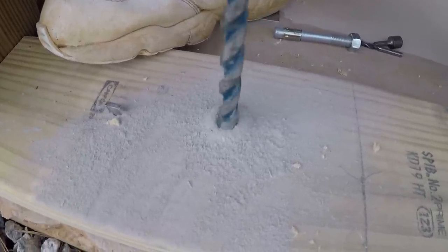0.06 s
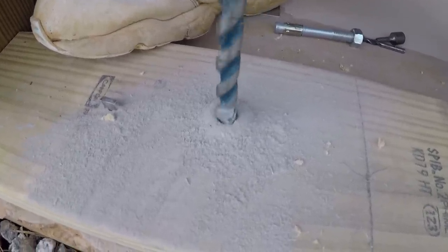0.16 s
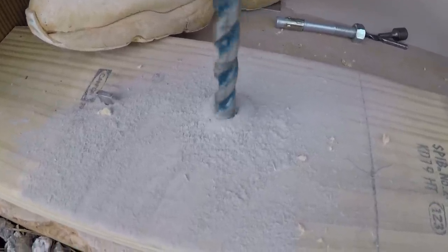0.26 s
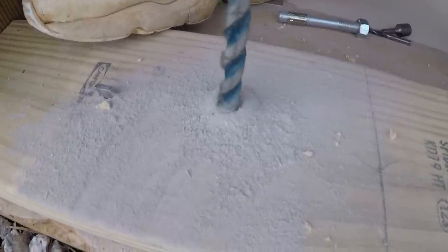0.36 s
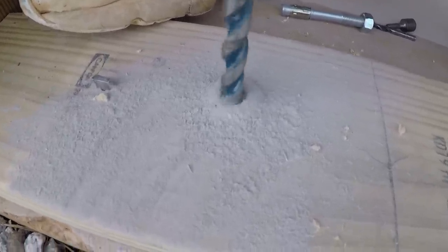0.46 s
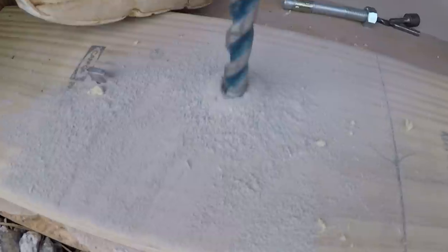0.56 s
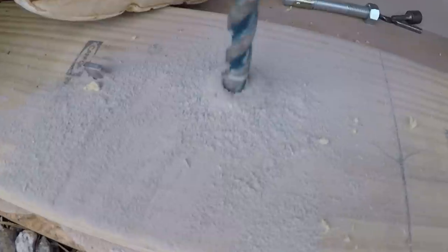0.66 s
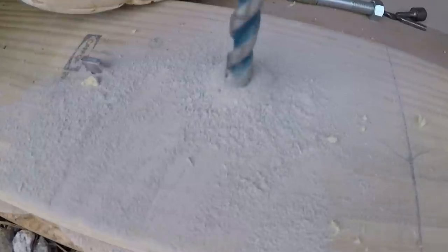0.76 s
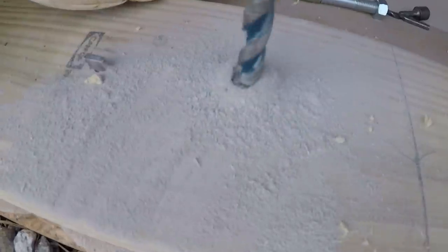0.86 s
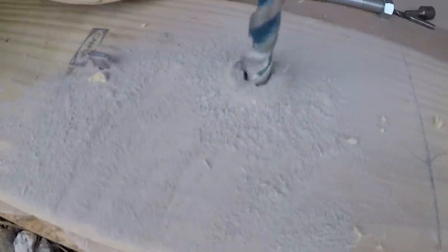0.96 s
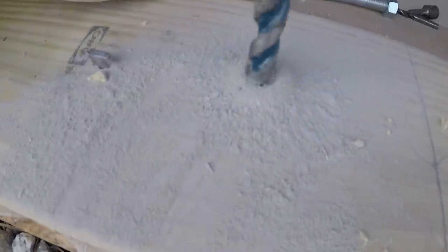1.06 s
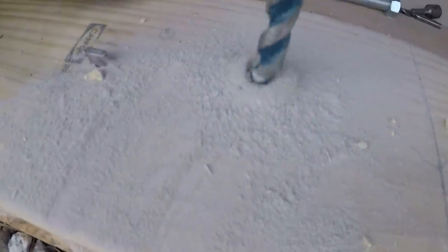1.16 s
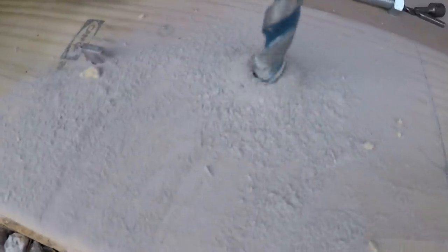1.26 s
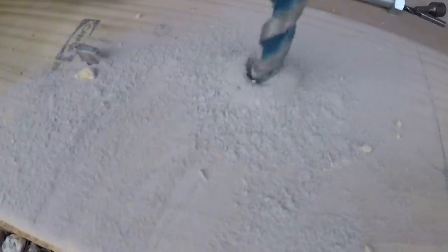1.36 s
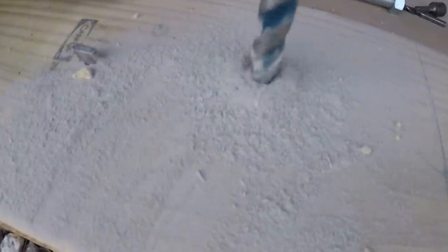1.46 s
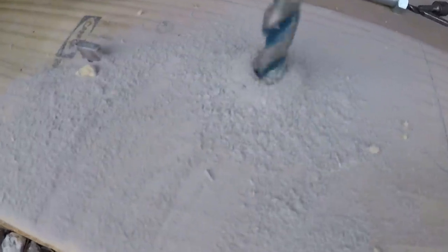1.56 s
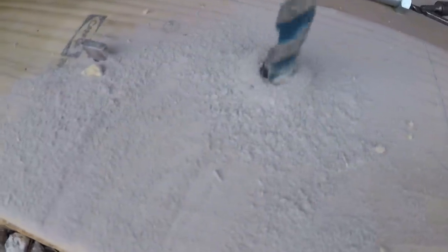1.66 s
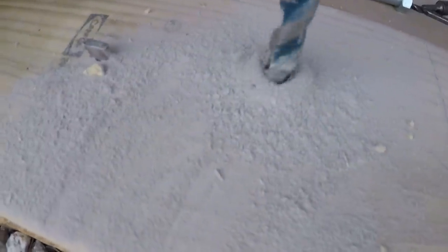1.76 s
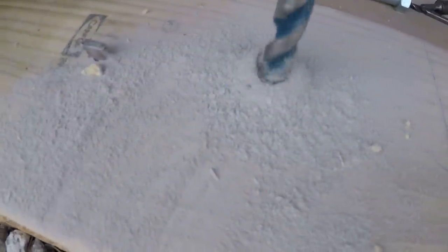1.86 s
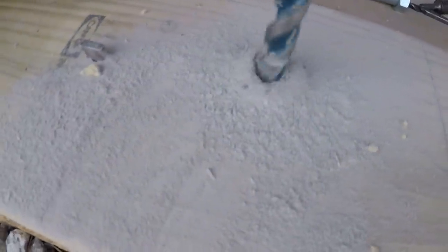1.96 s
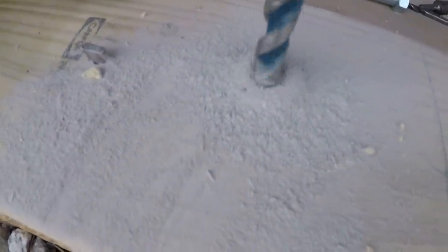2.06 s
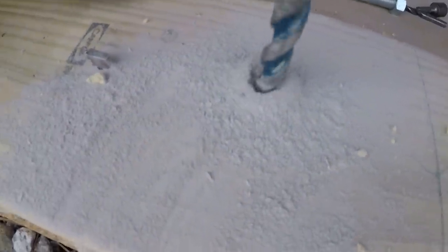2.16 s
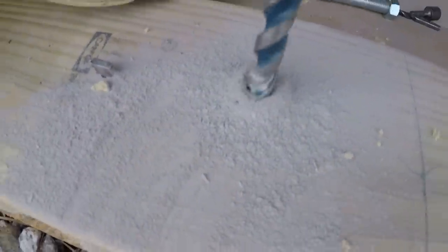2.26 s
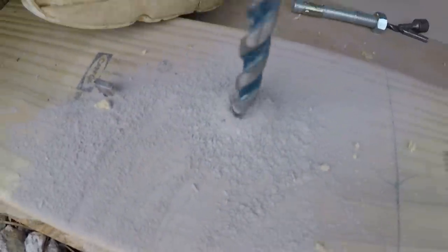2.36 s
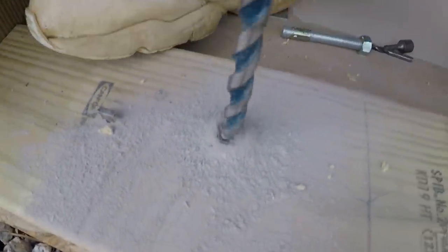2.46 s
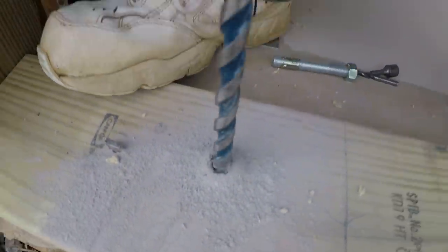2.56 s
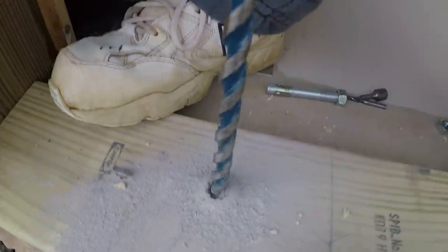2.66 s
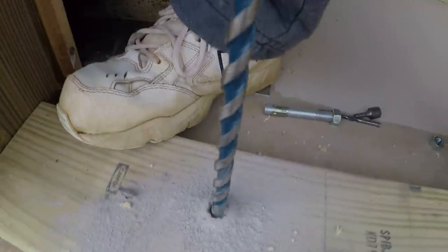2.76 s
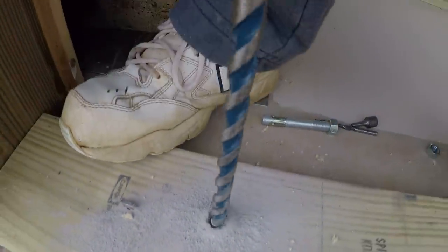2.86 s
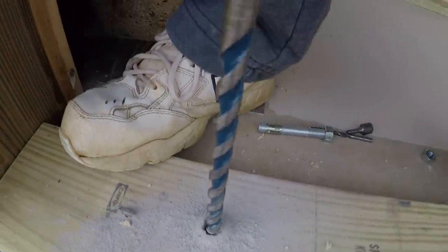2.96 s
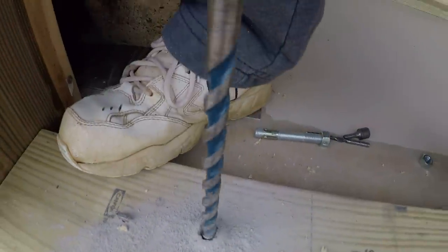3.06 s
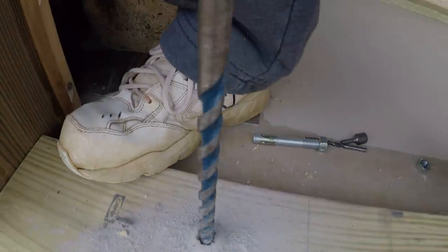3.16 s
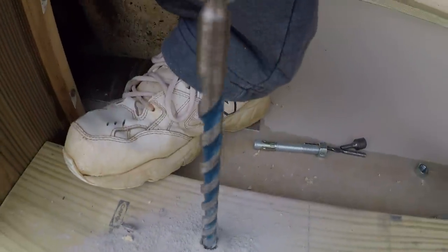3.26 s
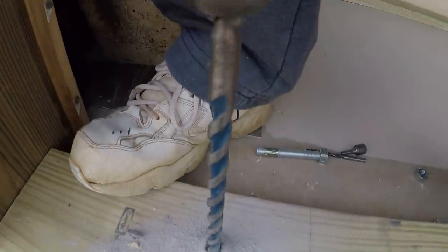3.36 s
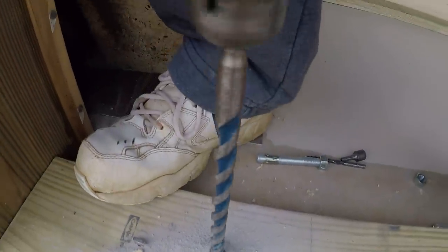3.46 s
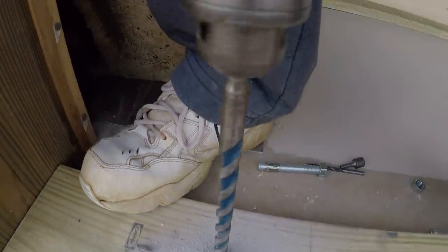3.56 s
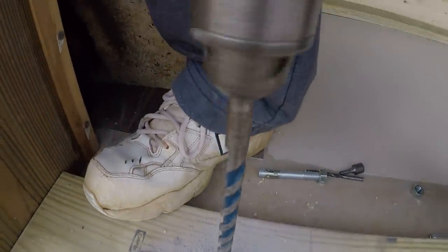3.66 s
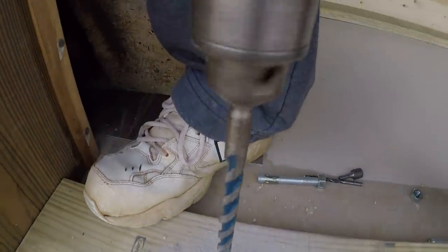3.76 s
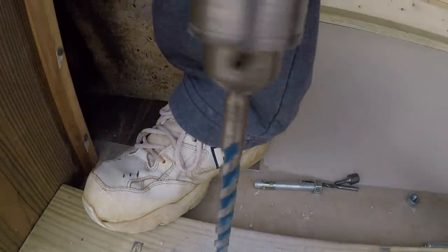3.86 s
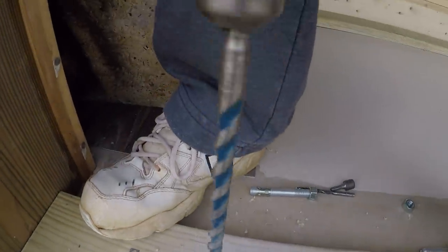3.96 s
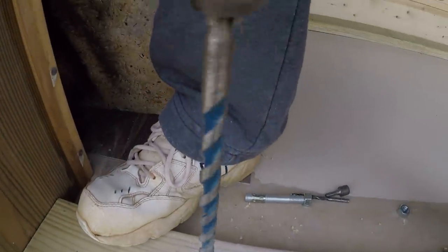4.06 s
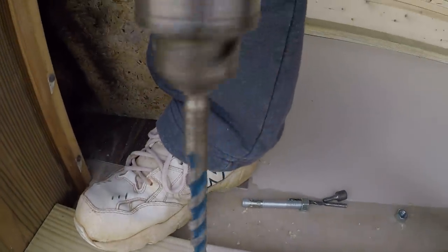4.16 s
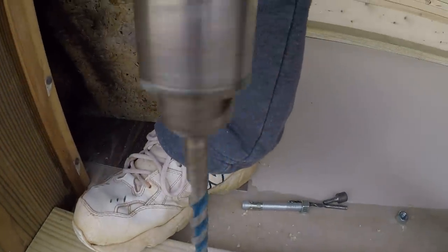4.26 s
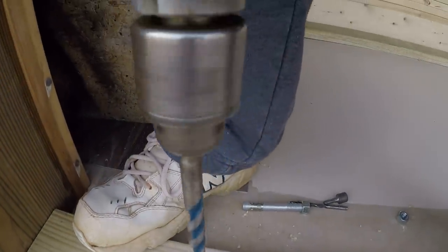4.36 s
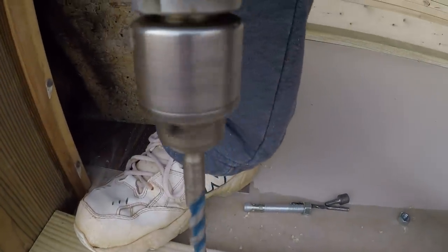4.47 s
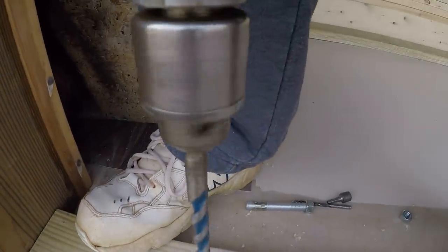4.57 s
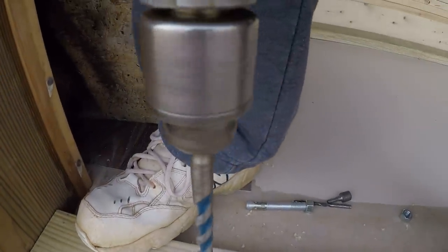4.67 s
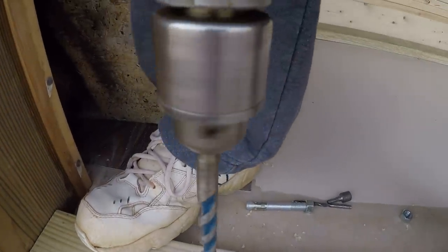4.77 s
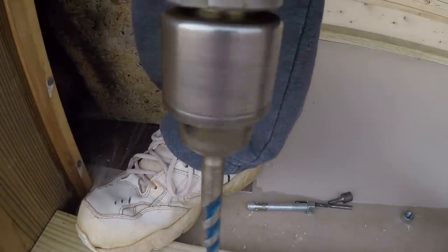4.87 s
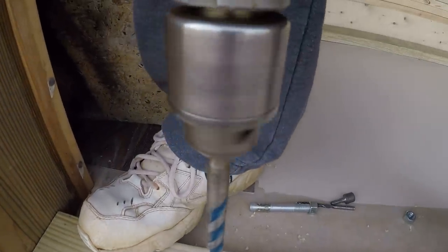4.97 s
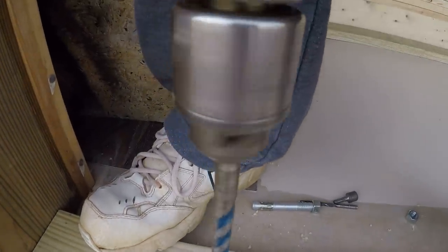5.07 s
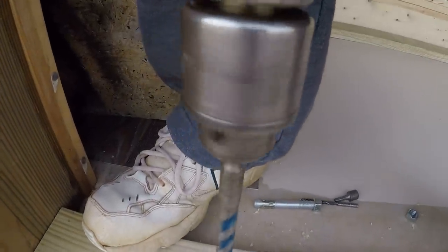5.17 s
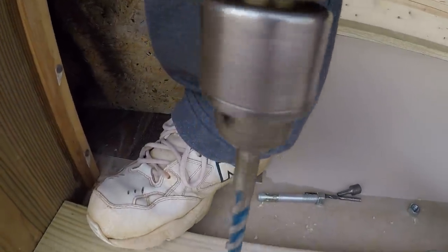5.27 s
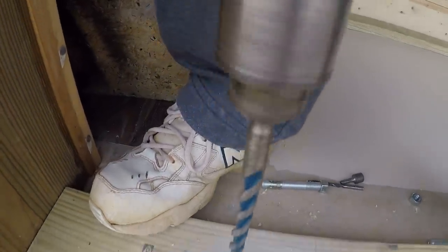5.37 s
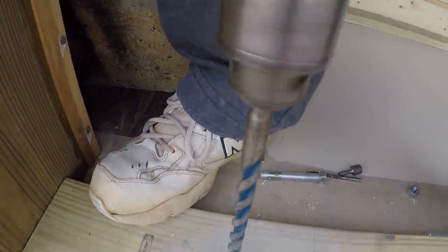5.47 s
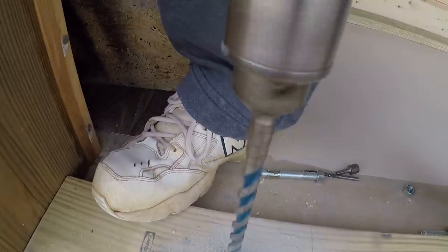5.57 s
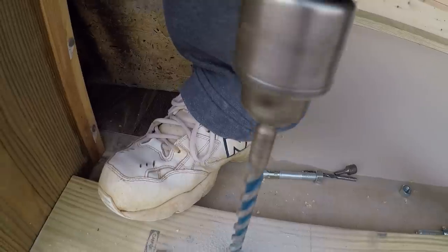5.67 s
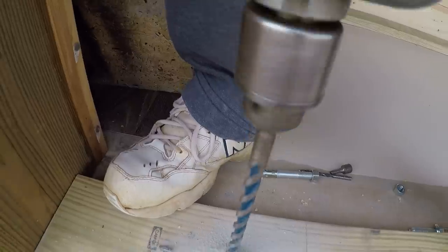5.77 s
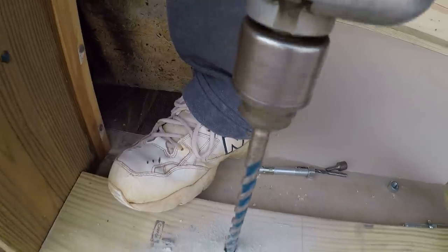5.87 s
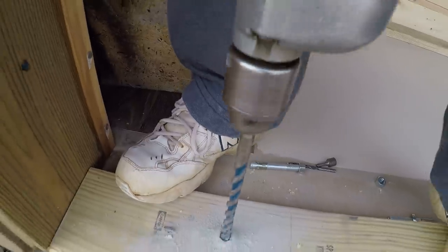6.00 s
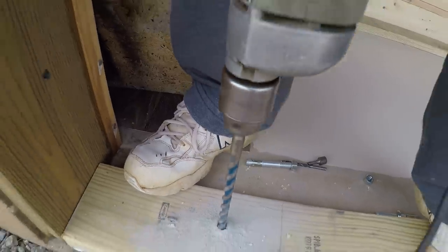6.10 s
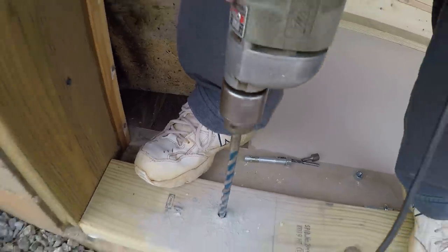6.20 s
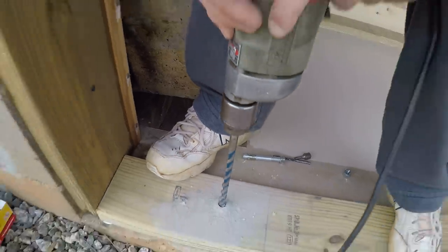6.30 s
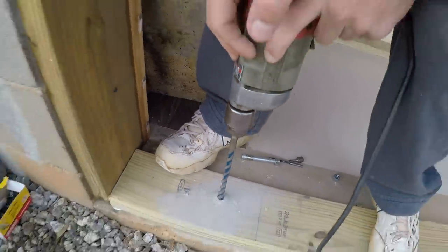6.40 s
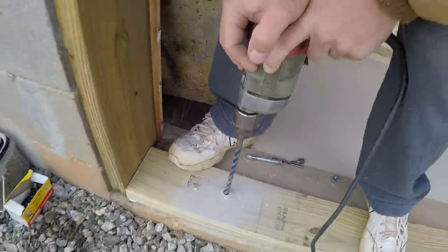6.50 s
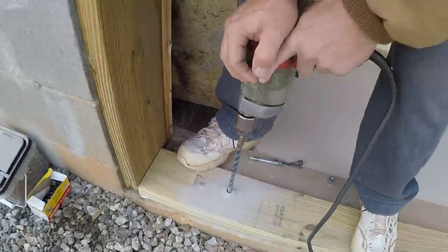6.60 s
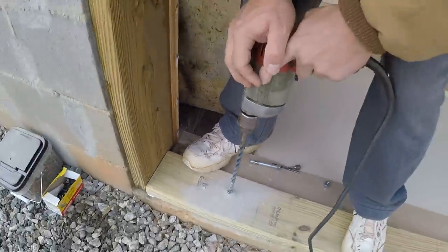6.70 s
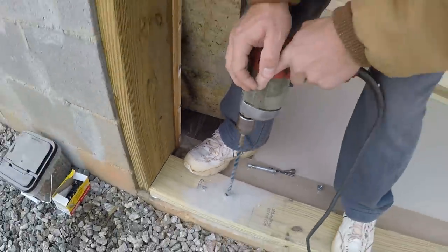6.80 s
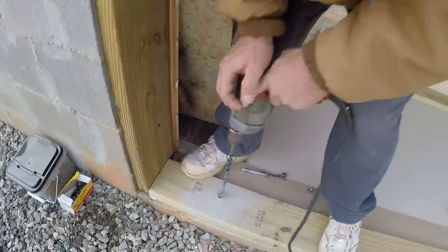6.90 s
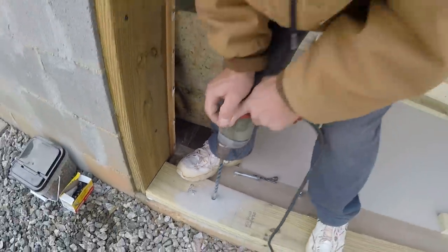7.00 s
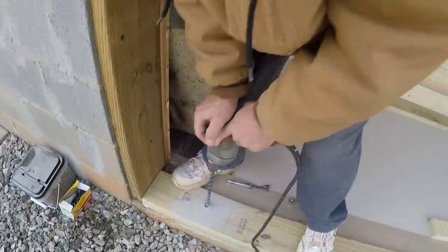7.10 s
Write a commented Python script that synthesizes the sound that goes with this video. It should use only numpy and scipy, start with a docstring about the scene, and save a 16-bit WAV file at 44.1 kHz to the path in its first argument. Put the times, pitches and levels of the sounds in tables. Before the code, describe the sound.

Close hammer drilling through wood into concrete: quick pumping thuds and a shrill motor whine, then steadier metallic chatter, air buffeting, and a more distant finish.

```python
"""Hammer drill through a plank into concrete

A corded hammer drill drives a masonry bit through a sill plank into concrete, close to a hand-held camera. One
motor speed sets the pitch of the commutator whine and shaft hum, and the pace of the hammer beat. The bit is
pumped up and down: blows and slams make the plank thud, the bit and chuck ring as steel. Shaped noise makes the
fan roar, gear hiss and air hiss; cooling air buffets the two microphone ports. Single ticks of the gear and
chuck, chuck squeaks and the deep rumble of the moving camera complete it."""
import sys
import numpy as np
from scipy.fft import rfft, irfft, next_fast_len
from scipy.io import wavfile
from scipy.ndimage import uniform_filter1d, map_coordinates

SR = 44100
rng = np.random.default_rng(int(sys.argv[2]) if len(sys.argv) > 2 else 0)


def wav_out(sig):
    """Save sig, one row per channel (or a flat mono array), as 16-bit PCM at SR to the path in sys.argv[1]."""
    wavfile.write(sys.argv[1], SR, np.round(np.clip(np.atleast_2d(sig).T, -1, 1) * 32767).astype(np.int16))


N = 314874  # length in samples

# motor speed between strokes, as the pitch of the whine: (time [s], pitch [Hz])
MOTOR_SPEED = [(0.0, 4081.0), (0.12, 4175.0), (0.38, 4173.0), (0.91, 4182.0), (1.19, 4305.0),
               (1.44, 4324.0), (2.22, 4300.0), (2.47, 4231.0), (2.65, 4085.0), (2.9, 4017.0),
               (3.05, 3897.0), (3.6, 3722.0), (3.85, 3711.0), (3.97, 3854.0), (4.1, 4112.0), (4.35, 4256.0),
               (4.55, 4372.0), (5.1, 3931.0), (5.5, 3845.0), (6.0, 3829.0), (6.3, 3663.0), (6.62, 3797.0),
               (6.8, 4100.0), (6.95, 4235.0), (7.14, 4350.0)]
WHINE_PER_TURN, WHINE_PER_BLOW = 12, 137  # whine cycles in a shaft turn and between hammer blows
# commutator whine: (time [s], whine level [dB], level an octave up [dB])
WHINE_LEVELS = [(0, -29, -28), (.5, -22.5, -20), (.9, -26, -32), (1.3, -34, -27.5), (1.7, -27.5, -26.5),
                (2.2, -28, -36), (2.42, -44, -31), (2.65, -42, -31), (2.95, -46, -38), (3.25, -47, -42),
                (3.55, -29.5, -26), (3.85, -39, -44), (4.15, -28.5, -36.5), (4.45, -19.5, -31.5),
                (4.62, -24.5, -34), (4.75, -33, -32), (4.92, -31, -38), (5.05, -41, -52), (5.3, -59, -63),
                (5.9, -43, -63), (6.05, -42, -52), (6.1, -35, -51), (6.28, -32, -48), (6.34, -45, -50),
                (6.9, -50, -46), (6.96, -35, -42), (7.14, -27, -36)]
# shaft hum: (time [s], level [dB])
HUM_LEVEL = [(0, -52), (2.4, -53.5), (2.9, -55), (3.1, -40.5), (4.2, -44), (4.6, -38), (6.3, -47.5),
             (6.6, -54), (7.14, -50)]
# gear-tooth tone: (time [s], level [dB])
TOOTH_LEVEL = [(0, -70), (5.9, -70), (6.0, -41), (6.6, -42), (6.7, -70), (7.14, -70)]
TOOTH_PER_TURN = 13.65  # gear-tooth cycles in a shaft turn
# motor noises: (time [s], fan roar level [dB], gear hiss level [dB], air hiss level [dB])
MOTOR_LEVELS = [(0, -27.5, -30, -32.5), (.5, -25, -28.5, -37), (1.2, -25.5, -29, -34),
                (2.4, -24.5, -29, -37), (2.64, -27, -27, -33.5), (2.92, -29.5, -28.5, -30),
                (3.7, -27.5, -26, -34), (3.84, -31.5, -28, -45), (3.98, -26.5, -29.5, -47),
                (4.45, -23, -29, -38.5), (4.6, -23.5, -22.5, -37.5), (4.97, -27.5, -24.5, -36.5),
                (5.31, -30.5, -32.5, -57), (5.59, -32, -35.5, -71), (6.26, -30.5, -28, -45.5),
                (6.5, -37, -28, -44.5), (6.7, -34, -35, -51), (6.84, -33.5, -33.5, -46),
                (7.0, -32, -33.5, -41.5), (7.14, -30, -29.5, -43)]
# fan roar colour with the camera on the plank: (frequency [Hz], level [dB])
FAN_COLOUR = [(60, -72), (200, -26), (400, -26), (650, -7.5), (800, -0.5), (880, 7.5), (980, 6),
              (1130, 3.5), (1380, -5.5), (1600, 3), (1950, 2.5), (2600, -32), (5000, -25), (9000, -68)]
# fan roar colour with the camera turned up to the motor: (frequency [Hz], level [dB])
FAN_UP_COLOUR = [(60, -36), (200, -30), (400, -11), (650, -4.5), (850, 2.5), (1000, 3.5), (1230, 4),
                 (1400, -3), (1550, -5.5), (1950, -9.5), (2600, -20), (5000, -21), (9000, -60)]
# gear hiss colour close by: (frequency [Hz], level [dB])
GEAR_COLOUR = [(1500, -13), (2700, 4.5), (3150, 9.5), (3450, 6.5), (3750, 7), (4400, 6.5), (5000, -3.5),
               (6000, 2), (9000, -53), (12000, -68)]
# gear hiss colour with the camera drawn back: (frequency [Hz], level [dB])
GEAR_FAR_COLOUR = [(1200, -13.5), (1900, 7), (2400, -0.5), (2800, -8), (3200, 3.5), (3650, 5), (3870, 10),
                   (4050, 3), (4300, 0), (4700, -3), (6000, 0), (9000, -50), (12000, -60)]
# main part of the air hiss: (frequency [Hz], level [dB])
AIR_COLOUR = [(4000, -47), (7000, 2), (9200, 2.5), (10200, -1.5), (11000, -35)]
# top part of the air hiss: (frequency [Hz], level [dB])
AIR_TOP_COLOUR = [(9500, -25), (10500, 1), (11400, -2.5), (12000, -17), (12800, -6.5), (14200, -20),
                  (15000, -44)]
# howl in two resonances of the fan housing: (time [s], low howl level [dB], high howl level [dB])
HOWL_LEVELS = [(0, -27.5, -45), (.35, -30, -32), (.6, -34, -28), (.9, -32, -30), (1.401, -32.5, -31),
               (1.901, -33, -30.5), (2.4, -36, -33), (2.6, -39.5, -50), (7.14, -49, -39.5)]
# those two resonances: (frequency [Hz], width [Hz], level [dB])
HOUSING_MODES = [(1126, 175, 0), (1600, 250, 0)]
# camera aim: (time [s], turn from plank up to motor [0-1], lift of lowest bit mode [dB], top hiss level [dB])
CAMERA_AIM = [(0, 0.72, 4, -2.5), (1, 0.2, 4, -1.5), (2.4, 0, 0.5, 1), (3, 0.07, 7, -4),
              (3.7, 0.11, 6, -0.5), (4.05, 0.96, 4, -5), (4.8, 0.95, -1, -6.5), (5.2, 0.48, 8, -5),
              (5.7, 0.61, 10, -14), (6, 0.8, -2, -4), (6.5, 0.69, 0, -3), (6.75, 0.6, -1, -1),
              (7.14, 0.76, 19, -2)]
# camera drawn back from the drill: (time [s], share [0-1])
CAMERA_BACK = [(0, 0), (6.1, 0), (6.3, .5), (6.68, 1), (7.14, 1)]

# steel noises: (time [s], bit clang level [dB], chuck rattle level [dB])
STEEL_LEVELS = [(0, -27.5, -26.5), (.7, -24.5, -24), (1.1, -31, -25.5), (1.8, -29, -24), (2.44, -31.5, -26),
                (2.5, -25.5, -23), (3.72, -26, -23.5), (3.8, -32, -30), (4.26, -29, -28.5),
                (4.48, -33, -26), (4.52, -34, -28.5), (4.85, -25, -25), (5.03, -24, -24.5),
                (5.16, -30, -28.5), (5.2, -34, -35), (5.29, -35.5, -35), (5.55, -38.5, -39.5),
                (5.78, -34, -34.5), (5.99, -27.5, -32.5), (6.48, -33, -37), (6.76, -43, -40),
                (7.14, -49, -34.5)]
# resonances of the bit: (frequency [Hz], width [Hz], level [dB])
BIT_MODES = [(2186, 156, 6), (2470, 210, 9.5), (2704, 96, 7.5), (2923, 63, 6.5)]
BIT_LAGS = [.03, .63, .63, .63]  # when each bit mode swells, in beats after the blow
# resonances of the chuck: (frequency [Hz], width [Hz], level [dB])
CHUCK_MODES = [(5530, 1660, 1), (6290, 840, 9.5), (6880, 360, 4), (6930, 530, 11), (7565, 110, 9),
               (8200, 280, -10)]
# pings, low after a blow and high on the rebound: (time [s], low level [dB], high level [dB], high pitch [Hz])
PING_LEVELS = [(0, -32, -31, 2536), (.13, -36, -22.5, 2460), (.25, -33, -29, 2450), (.37, -33, -19.5, 2475),
               (.55, -28, -31, 2440), (.75, -28, -42, 2393), (1, -51, -28, 2464), (2.46, -40, -42, 2499),
               (2.52, -23, -26, 2528), (2.8, -31, -25, 2550), (3.1, -25, -28.5, 2468),
               (3.7, -27, -28.5, 2515), (3.8, -37, -40, 2478), (4.49, -60, -57, 2445),
               (4.53, -38, -22, 2447), (4.9, -31, -31, 2431), (5.05, -39, -29, 2540), (5.3, -50, -36, 2440),
               (5.7, -32, -33, 2500), (5.9, -18.5, -31, 2595), (6.05, -18.5, -44, 2580),
               (6.2, -19, -39, 2602), (6.35, -23.5, -33, 2602), (6.5, -21, -49, 2583),
               (6.6, -52, -52, 2600), (7.14, -60, -60, 2570)]
LOW_PING_HZ, PING_LAGS = 2250, (.12, .7)  # lags of low and high ping in beats after the blow
# low pings are raised and lowered by this in turn: (time [s], change [dB])
UNEVEN_PINGS = [(0, 0), (6.05, 0), (6.2, 3), (6.5, 3)]
# short squeaks of the chuck: (time [s], pitch [Hz], level [dB])
CHUCK_SQUEAKS = [(.993, 6000, -17), (1.224, 6096, -18), (1.251, 6073, -15.5), (1.453, 6050, -15),
                 (1.519, 6120, -15), (1.742, 5990, -17), (1.779, 6020, -20), (2.003, 6060, -16),
                 (2.037, 6050, -18), (2.067, 6120, -24), (2.262, 6030, -15), (2.297, 6100, -11),
                 (2.347, 6980, -17), (2.359, 6970, -10.5), (2.593, 6100, -13), (2.732, 6200, -22)]
SQUEAK_S = 0.0035  # time from the peak down to about a third, each way
# single sharp ticks, of the hammer gear near 3-4 kHz and of the chuck near 6.7-6.9 kHz: (time [s], level [dB],
# pitch [Hz])
SHARP_TICKS = [(4.8214, -13, 6720), (4.8499, -6, 3690), (4.9174, -13, 4090), (4.9514, -15, 3100),
               (4.9871, -15, 3174), (5.015, -8, 6700), (5.0489, -7, 3740), (5.0828, -12, 3945),
               (5.1274, -13, 3860), (5.1554, -14, 6890), (5.9364, -10, 3220), (5.9764, -18, 3236),
               (6.0087, -15, 3977), (6.0454, -19, 3015), (6.0811, -15, 3730), (6.1549, -12, 3163),
               (6.1923, -20, 3690), (6.2253, -19, 3820), (6.2684, -15, 3700), (6.3124, -19, 3125),
               (6.341, -18, 3667), (6.3779, -8, 3790), (6.4143, -19, 3670), (6.4527, -15, 3410),
               (6.4901, -10, 3635), (6.5261, -13, 3704), (6.562, -17, 3880)]
TICK_T60, TICK_NOISE = 0.014, 0.89  # seconds to fall 60 dB; share of noise beside the tone

# steady lean on the drill: (time [s], pressure [0-1])
LEAN = [(0, 0.11), (.8, 0.21), (1, 0), (2.46, 0.12), (2.55, 0.54), (3, 0.35), (3.8, 0.24), (4, 0.16),
        (4.47, 0.01), (4.52, 0.26), (4.9, 0.28), (5.3, 0.44), (5.8, 0.36), (6.5, 0.33), (7.14, 0)]
# the bit is slammed down, held and lifted: (time [s], held [s], push [0-1], thud level [dB], crack level [dB])
PUSH_STROKES = [(0.145, 0.077, 0.3, -9.5, -9), (0.399, 0.35, 0.33, -9.5, -19),
                (0.916, 0.087, 0.55, -7.5, -6), (1.181, .11, 0.36, -10, -17), (1.442, .11, 0.41, -8, -6),
                (1.69, 0.091, 0.69, -9.5, -3), (1.948, .1, 0.7, -8.5, -6), (2.21, .11, 0.89, -8, -6),
                (2.475, 0.1, 0.5, -10, -2.5)]
BITE_S, LIFT_S = 0.024, .035  # the push builds up and lets go
DIP_S, RECOVER_S = 0.014, .13  # levels dip at a slam and creep back after the lift
SAG_HZ_PER_S = 1700  # whine pitch lost each second under a full push
# (dip [dB], rise while the bit bites [dB]) at a full push
WHINE_PUSH, OCTAVE_PUSH, ROAR_PUSH, HOWL_PUSH = (13.7, -4), (16, -13), (8.2, -1.5), (8.3, -12.5)
GEAR_PUSH, AIR_PUSH, CLANG_PUSH, RATTLE_PUSH = (7.8, 5.6), (5.6, 11.8), (1.6, 3.7), (4.7, 1.6)
# hammer blows heard through the plank: (time [s], level [dB], lowest plank mode level [dB])
THUD_LEVELS = [(0, -26, 1), (.6, -27, -1.5), (2.3, -27, -7.5), (2.46, -27, -14), (2.6, -26.5, -10),
               (2.96, -28, -3), (3.05, -31.5, 1), (3.2, -31, -3.5), (3.55, -26, -2), (5.95, -36.5, 0),
               (6.4, -48, -6), (6.64, -37, -13), (6.7, -43, 0)]
# resonances of the plank: (frequency [Hz], width [Hz], level [dB])
PLANK_MODES = [(167.2, 16, 1), (271.5, 139, -2), (476, 90, 0), (239, 23, -8.5)]
LIFTED_DB, TOUCH = 34, 0.287  # under TOUCH pressure the blows weaken, by LIFTED_DB at no pressure
SKEW = 0.67  # makes swells rise slowly and stop short

# cooling air on each port: (time [s], left level [dB], right level [dB])
DRAUGHT_LEVELS = [(0, -70, -53), (1, -73, -63), (2.7, -73, -84), (3.1, -42, -49.5), (3.55, -29.5, -40.5),
                  (3.72, -21.5, -30), (3.8, -20.5, -38), (3.92, -14.5, -48), (4.03, -30, -37),
                  (4.2, -40.5, -47), (4.4, -32, -32), (4.7, -30.5, -32), (4.92, -21.5, -27.5),
                  (5.03, -14.5, -31), (5.15, -11.5, -39), (5.45, -12.5, -40), (5.8, -13.5, -41),
                  (5.9, -25.5, -43), (5.94, -35, -37), (6.25, -68, -53), (6.75, -76, -55), (7.14, -64, -49)]
# colour of the air on the left port: (frequency [Hz], level [dB])
LEFT_GUST = [(20, -16), (45, -16), (90, -0.5), (140, 1.5), (210, 1.5), (350, -4.5), (500, -5), (850, -10.5),
             (1300, -19), (2500, -72)]
# colour of the air on the right port: (frequency [Hz], level [dB])
RIGHT_GUST = [(20, -19), (45, 8), (90, 11.5), (150, -0.5), (250, -55), (500, -57)]
# left-port air in the right channel: (frequency [Hz], level [dB])
LEAK_LEVEL = [(60, -38), (200, -19), (400, -9.5), (850, -2.5), (2000, 0)]
# its lag: (frequency [Hz], lag [radians])
LEAK_PHASE = [(45, .9), (130, 1.3), (250, 3.06), (1000, 3.79), (2000, 2.5)]
# single eddies popping on the left port: (time [s], level [dB])
EDDY_POPS = [(3.744, -3), (3.777, 0), (3.813, -6), (3.833, -1), (3.846, -16), (3.896, -2), (3.911, -20),
             (3.938, -11)]
# deep rumble of the moving camera: (time [s], level [dB])
SWAY_LEVEL = [(0.0, -60), (2.52, -75), (3.72, -49), (3.76, -41), (4.08, -57), (4.45, -44), (5.35, -50),
              (6.24, -55), (6.32, -69), (6.64, -47), (6.94, -56), (7.14, -40)]
# right channel against the left: (frequency [Hz], level [dB])
RIGHT_LEVEL = [(60, 1.2), (200, 0), (400, -5), (650, -3), (830, 0.1), (1000, 2), (1300, 2.4), (1800, -3),
               (2300, 0.1), (3200, 0), (4200, -4), (5000, -12), (7000, -15), (9500, -6), (12000, -1)]
# right channel behind the left: (frequency [Hz], lag [radians])
RIGHT_PHASE = [(60, 0.13), (300, 1.2), (450, 1.2), (850, 3.02), (1300, 4.62), (1600, 8), (2100, 9.22),
               (2500, 12.7), (4000, 11.44), (6000, 13.6), (9000, 13.9), (15000, 7.4)]
# how alike the channels are: (frequency [Hz], likeness [0-1])
LIKENESS = [(50, 0.38), (120, 1), (830, 0.98), (1200, 0.9), (1750, 0.065), (2300, 0.62), (3100, 0.62),
            (4200, 1), (5000, 0.65), (6000, 0.15), (8000, 0.26)]
TOP_HZ = 15200  # band limit


def amp(db):
    """Turns dB into gain."""
    return 10 ** (np.asarray(db) / 20)


def unit(pair):
    """Scales so that the mean of the channels has rms 1."""
    return pair / np.sqrt(np.mean(pair.mean(0) ** 2) + 1e-20)


def along(points, hz):
    """Reads (frequency, value) points on a log axis."""
    f, v = np.transpose(points)
    return np.interp(np.log(hz + 1), np.log(f + 1), v)


def curves(rows):
    """Gives one value per sample for each column after the time."""
    s, *cols = np.transpose(rows)
    return [np.interp(np.arange(N) / SR, s, c) for c in cols]


def wobble(rate):
    """A smooth random curve through rate random points a second."""
    return map_coordinates(rng.standard_normal(int(N * rate / SR) + 4), [np.arange(N) * rate / SR])


def filtered(x, response):
    """Shapes x by a complex response of frequency."""
    m = next_fast_len(N + SR // 2)
    return irfft(rfft(x, m) * response(np.fft.rfftfreq(m, 1 / SR)), m)[..., :N]


def modes(table):
    """Response of a set of resonances, each ringing longer the narrower it is; signs alternate."""
    def response(f):
        return sum((-1) ** k * amp(db) * 1j * f * w / (c * c - f * f + 1j * f * w)
                   for k, (c, w, db) in enumerate(table))
    return response


def ports(near, other, colour):
    """Both channels: the right hears the left's sound late and coloured, plus a share by another path."""
    alike = lambda f: np.clip(along(LIKENESS, f), 0, 1)
    right = lambda f: colour(f) * amp(along(RIGHT_LEVEL, f)) * np.exp(-1j * along(RIGHT_PHASE, f))
    parts = filtered(np.array([near, near, other]), lambda f: np.array(
        [colour(f), right(f) * alike(f), right(f) * np.sqrt(1 - alike(f) ** 2)]))
    return np.array([parts[0], parts[1] + parts[2]])


def steady(gate):
    """Frees a gate of its slow level, keeping the quick swells."""
    return gate / np.sqrt(uniform_filter1d(gate ** 2, size=SR // 14))


def rush(gate, colour):
    """Stereo noise of rms 1 under a gate, through a colour."""
    return unit(ports(*(steady(gate) * rng.standard_normal((2, N))), colour))


def beating(beat, depth, scatter_db):
    """A gate that swells once a hammer beat, each swell at a new strength."""
    size_db = scatter_db * np.clip(rng.standard_normal(256), -1.6, 1.6)
    turn = 2 * np.pi * beat
    swell = np.exp(depth * np.cos(turn + SKEW * (1 - np.cos(turn))))
    return swell * amp(depth * size_db[np.round(beat).astype(int) + 2])


def sway():
    """Rumble of the moving camera: noise below the pitch of the wind, different on each port."""
    deep = filtered(rng.standard_normal((2, N)), lambda f: (f > 15) / (1 + (f / 38) ** 8))
    deep = deep * amp([[3], [-3]])
    return amp(curves(SWAY_LEVEL)[0] - 2.0) * unit(deep)


def draught():
    """Lumpy turbulence on each port; the stereo matrix leaks the left, turned over, into the right channel."""
    left_db, right_db = curves(DRAUGHT_LEVELS)
    lumps = [steady(amp(wobble(60) + 3.5 * wobble(300))) * rng.standard_normal(N) for side in range(2)]
    leak = lambda f: amp(along(LEAK_LEVEL, f)) * np.exp(-1j * along(LEAK_PHASE, f))
    port = lambda f: amp(along(LEFT_GUST, f)) * np.array([np.ones_like(f), leak(f)])
    left = filtered(lumps[0], port)
    pops = np.zeros(N)
    for s, db in EDDY_POPS:
        pops[round((s + .004) * SR)] = amp(db + 36.0)
    pops = filtered(pops, lambda f: 1j * port(f))  # a push, then a pull
    right = filtered(lumps[1], lambda f: amp(along(RIGHT_GUST, f))) * amp([[-7], [0]])
    return amp(left_db) * unit(left) / 2 + amp(right_db) * unit(right) + pops


def pumping():
    """Pushing the drill: how hard the bit bites, how far levels dip, and the whine pitch lost in Hz."""
    t, bite, dip, sag_hz = np.arange(N) / SR, 0, 0, 0
    for s, held, push, *_ in PUSH_STROKES:
        off = s + held + LIFT_S
        bite = bite + push * np.interp(t, [s, s + BITE_S, s + held, off], [0, 1, 1, 0])
        dip = dip + push * np.interp(t, [s, s + DIP_S, off, off + RECOVER_S], [0, 1, 1, 0])
        lost_hz = SAG_HZ_PER_S * push * (off - s)
        sag_hz = sag_hz + lost_hz * np.interp(t, [s, off, off + RECOVER_S], [0, 1, 0])
    return bite, dip, sag_hz


def hammer_blows(beat, press, thud_db):
    """One click a beat, stronger under pressure; a slam takes the place of a blow."""
    at = np.flatnonzero(np.diff(np.floor(beat + .18)) > 0)
    blows = np.zeros(N)
    scatter = amp(.6 * rng.standard_normal(256)[:len(at)])
    blows[at] = (amp(thud_db) * np.clip(4 * press - .3, 0, 1))[at] * scatter
    for s, *_ in PUSH_STROKES:
        blows[round(s * SR):round((s + .027) * SR)] = 0
    return blows


def plank(beat, press):
    """Hammer blows and slams push the plank down; it thuds, and the slab answers a moment later."""
    t = np.arange(N) / SR
    fade = 0  # blows start a stroke stronger and end it weaker
    for s, held, *_ in PUSH_STROKES:
        off = s + held + LIFT_S
        fade = fade + np.interp(t, [s, s, off, off + RECOVER_S], [0.023, -0.14, 0.34, 0.11])
    thud_db, low_db = curves(THUD_LEVELS)
    thud_db = thud_db - 2 * fade - LIFTED_DB * np.clip(1 - press / TOUCH, 0, 1)
    blows = hammer_blows(beat, press, thud_db)
    grit = amp(thud_db - 39) * rng.standard_normal(N)  # grinding dust shakes the wood between blows
    force = -amp(50.5) * (blows + grit)

    # the plank shakes on after a slam, falling 60 dB in 0.6 s
    starts = [s for s, *_ in PUSH_STROKES]
    since = t - np.array([-9] + starts)[np.searchsorted(starts, t)]  # seconds after the latest slam
    shudder = unit(uniform_filter1d(rng.standard_normal((1, N)), size=SR // 700))[0]
    force = force + amp(-9 - 60 * since / .6) * shudder / 5

    # each slam is one heavy push with a short crack of noise
    cracks, t = np.zeros((2, N)), np.arange(SR // 40) / SR
    for s, _, _, db, crack_db in PUSH_STROKES:
        force[round((s + .004) * SR)] -= amp(db + 36.5)
        at = round((s + .003) * SR)
        cracks[:, at:at + len(t)] = amp(crack_db + 5 - 60 * t / 0.013) * rng.standard_normal((2, len(t)))
        cracks[:, at] += amp(crack_db + 10.5)  # sharp first edge

    low = filtered(force * amp(low_db), modes(PLANK_MODES[:1]))
    middle = filtered(force, lambda f: sum(modes([row])(f) for row in PLANK_MODES[1::2]))
    top_loss_db = 6 * np.interp(since, [0, .03, .7, 1], [0, 1, 1, .3])  # the top mode weakens after a slam
    top = filtered(force * amp(-top_loss_db), modes(PLANK_MODES[2:3]))
    wood = low + middle + top

    def soft(f):
        slab_echo = 1 + 0.24 * np.exp(-2j * np.pi * f * 0.00501)  # 5 ms later
        return slab_echo / (1 + 1j * f / 900) ** 2 / (1 + (125 / (f + 1)) ** 12)
    crisp = lambda f: 1 / (1 + (f / 6000) ** 4) / (1 + 600 / (1j * f + .1)) ** 2
    return ports(wood, wood, soft) + ports(*cracks, crisp)


def ticks():
    """Sharp ticks of the hammer gear and of the chuck: each is a dying tone with a burst of noise around it."""
    out, t = np.zeros(N), np.arange(SR // 50) / SR
    for s, db, hz in SHARP_TICKS:
        spray = uniform_filter1d(np.diff(rng.standard_normal(len(t) + 1)), size=3)
        tick = np.sin(2 * np.pi * hz * t) + TICK_NOISE * spray
        out[round((s + .001) * SR):][:len(t)] += amp(db - 2 - 60 * t / TICK_T60) * tick
    return ports(out, out, lambda f: 1 / (1 + 1j * f / 7500) ** 2 / (1 + (f / 8500) ** 12))


def ringing(table, beat, lags, depth, scatter_db, lift_db):
    """Gated noise in each mode; every blow favours other modes, and lift_db raises the lowest."""
    parts = []
    for row, lag in zip(table, lags):
        noise = beating(beat - lag, depth, scatter_db) * rng.standard_normal((2, N))
        parts.append(filtered(noise, modes([row])))
    slow = np.sqrt(uniform_filter1d(beating(beat, depth, scatter_db) ** 2, size=SR // 3))
    parts[0] = parts[0] * amp(lift_db)

    def edge(f):  # little sound outside the modes
        return 1 / (1 + (f / (1.116 * table[-1][0])) ** 8) / (1 + (0.14 * table[0][0] / (f + 1)) ** 4)
    return unit(ports(*(sum(parts) / slow), edge))


def ping(beat, hz, level_db, sharp, scatter_db):
    """One short pure tone a beat, each at a new strength, pitch and phase."""
    chance = rng.standard_normal((256, 3))[np.round(beat).astype(int) + 2].T
    phase = 2 * np.pi * np.cumsum(hz * (1 + .016 * chance[0])) / SR + 2 * chance[1]
    pulse = np.exp(sharp * (np.cos(2 * np.pi * beat) - 1))
    return amp(level_db + scatter_db * chance[2] + 2) * pulse * np.sin(phase)


def squeaks():
    """Short squeaks of the chuck: pure tones that swell and die smoothly."""
    out, t = np.zeros(N), np.arange(-SR // 40, SR // 40) / SR
    for s, hz, db in CHUCK_SQUEAKS:
        at = round(s * SR) - SR // 40
        out[at:at + len(t)] += amp(db + 4) * np.exp(-(t / SQUEAK_S) ** 2) * np.sin(2 * np.pi * hz * t)
    return out


def steel(beat, press, pushed):
    """Each blow rattles the chuck and rings the bit, as noise in its modes and as pings; the chuck squeaks."""
    clang_db, rattle_db = map(pushed, curves(STEEL_LEVELS), (CLANG_PUSH, RATTLE_PUSH))
    up, lift_db, _ = curves(CAMERA_AIM)
    depth = (2.0 + 2.1 * up) * np.minimum(press, .45)
    clang = amp(clang_db - 2.0) * ringing(BIT_MODES, beat, BIT_LAGS, depth, 1.9, lift_db)
    rattle = ringing(CHUCK_MODES, beat, [.08] * len(CHUCK_MODES), 0.95 * press, 7.4, lift_db=2.0)
    low_db, high_db, high_hz = curves(PING_LEVELS)
    low_beat, high_beat = beat - PING_LAGS[0], beat - PING_LAGS[1]
    low_db = low_db + curves(UNEVEN_PINGS)[0] * (-1) ** np.round(low_beat)
    tones = ping(low_beat, np.full(N, LOW_PING_HZ), low_db, sharp=2.2, scatter_db=.8)
    tones = tones + ping(high_beat, high_hz, high_db, sharp=2.6, scatter_db=1.2)
    tones = tones + squeaks()
    return clang + amp(rattle_db) * rattle + ports(tones, tones, np.ones_like)


def motor_tones(turns, pushed):
    """Whine, its octave, shaft hum and gear-tooth tone, all locked to the shaft turns."""
    whine_db, octave_db = map(pushed, curves(WHINE_LEVELS), (WHINE_PUSH, OCTAVE_PUSH))
    voices = ((WHINE_PER_TURN, whine_db), (2 * WHINE_PER_TURN, octave_db),
              (1, curves(HUM_LEVEL)[0]), (TOOTH_PER_TURN, curves(TOOTH_LEVEL)[0]))
    tones = 0
    for order, db in voices:
        level = np.sqrt(2) * amp(db + 2.06 * wobble(40))
        tones = tones + level * np.sin(2 * np.pi * order * turns + 0.67 * wobble(60))
    return ports(tones, tones, np.ones_like)


def blend(share, gate, first, second):
    """Noise that crosses from the first colour to the second as share goes from 0 to 1."""
    return sum(np.sqrt(part) * rush(gate, lambda f: amp(along(colour, f)))
               for part, colour in ((1 - share, first), (share, second)))


def motor(turns, beat, press, pushed):
    """Tones on the shaft speed over fan roar, howl and hiss that the blows shake; the gears tick at each blow."""
    roar_db, gear_db, air_db = map(pushed, curves(MOTOR_LEVELS), (ROAR_PUSH, GEAR_PUSH, AIR_PUSH))
    up, _, top_db = curves(CAMERA_AIM)
    throb = amp(1.06 * wobble(30)) * beating(beat, 0.097 * press, 2.5)
    roar = blend(np.clip(up, 0, 1), throb, FAN_COLOUR, FAN_UP_COLOUR)
    howl = sum(amp(pushed(db, HOWL_PUSH)) * rush(throb, lambda f: modes([row])(f) ** 2)
               for db, row in zip(curves(HOWL_LEVELS), HOUSING_MODES))
    back, = curves(CAMERA_BACK)
    tick = (3.9 + 2 * back) * press * np.exp(-((beat + .22) % 1) / .06)
    mesh = beating(beat + 0.019, 0.4 * press, 5.4) + tick
    gears = blend(back, mesh, GEAR_COLOUR, GEAR_FAR_COLOUR)
    puffs = beating(beat - .1, 0.55 * press, 7)
    air = rush(puffs, lambda f: amp(along(AIR_COLOUR, f)))
    air = air + amp(top_db - 6.0) * rush(puffs, lambda f: amp(along(AIR_TOP_COLOUR, f)))
    noises = amp(roar_db - 2.5) * roar + howl + amp(gear_db) * gears + amp(air_db) * air
    return motor_tones(turns, pushed) + noises


def scene():
    """One motor sets the tones and the hammer beat; the strokes dip and raise the drill's levels."""
    bite, dip, sag_hz = pumping()
    pushed = lambda level_db, push: level_db - push[0] * dip + push[1] * bite
    turns = np.cumsum(curves(MOTOR_SPEED)[0] - sag_hz) / SR / WHINE_PER_TURN
    beat = turns * WHINE_PER_TURN / WHINE_PER_BLOW  # counts hammer beats; sounds lead or lag its whole numbers
    lean, = curves(LEAN)
    press = np.maximum(lean, bite)
    background = sway() + draught()
    struck = plank(beat, press) + ticks() + steel(beat, press, pushed)
    return background + struck + motor(turns, beat, press, pushed)


def record(dry):
    """The camera rounds off the highest peaks and keeps nothing above its band limit."""
    rounded = dry / (1 + np.abs(dry) ** 6) ** (1 / 6)
    return filtered(rounded, lambda hz: hz < TOP_HZ)


dry = scene()
out = record(dry)
wav_out(out)
```